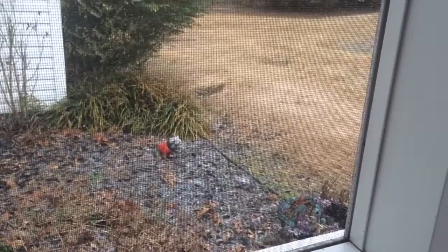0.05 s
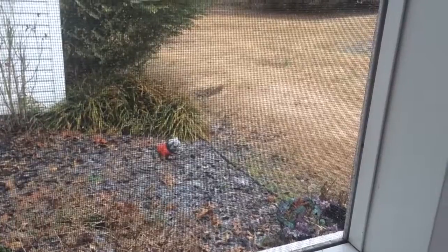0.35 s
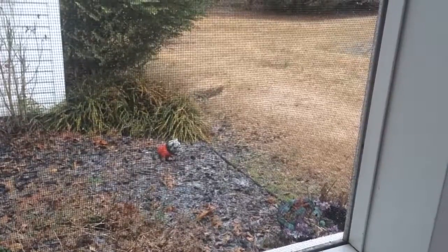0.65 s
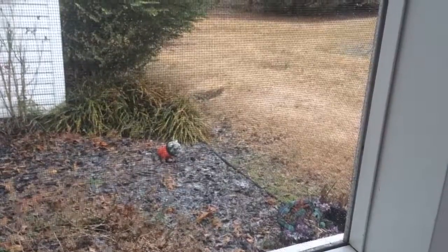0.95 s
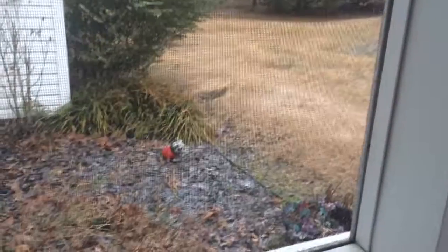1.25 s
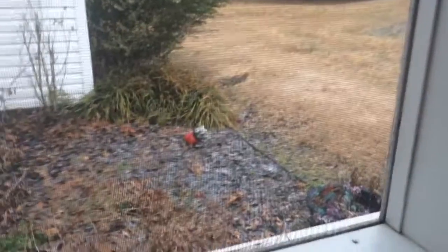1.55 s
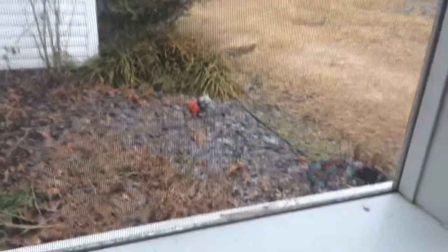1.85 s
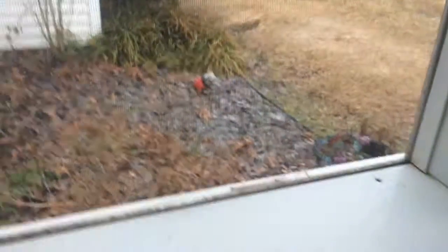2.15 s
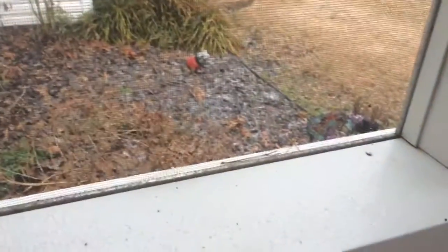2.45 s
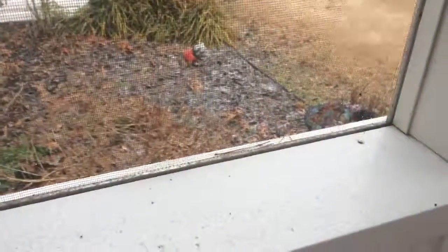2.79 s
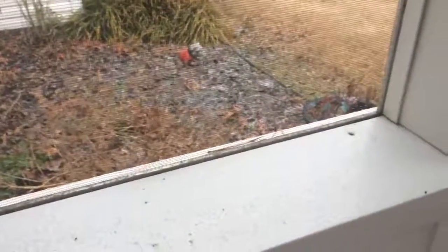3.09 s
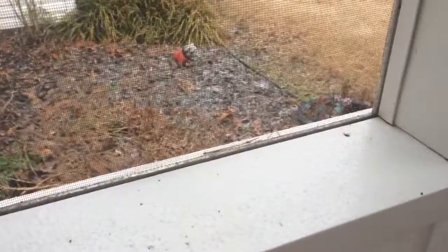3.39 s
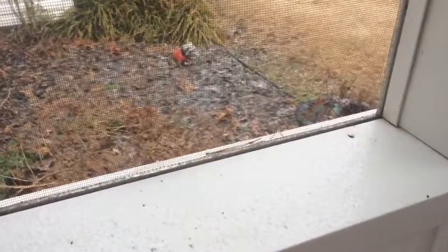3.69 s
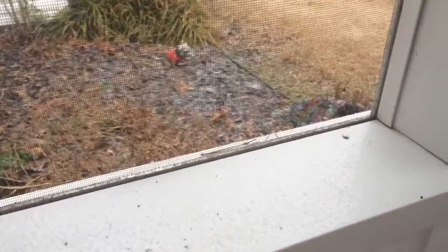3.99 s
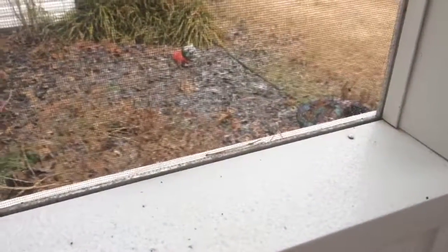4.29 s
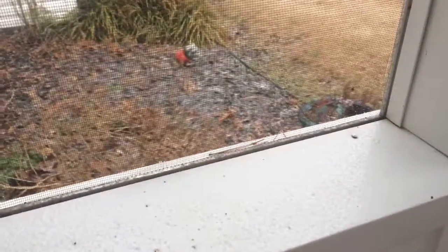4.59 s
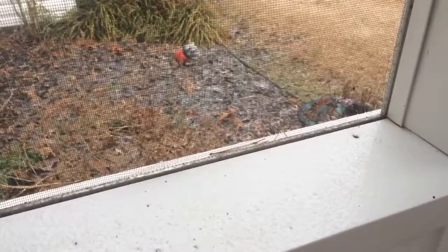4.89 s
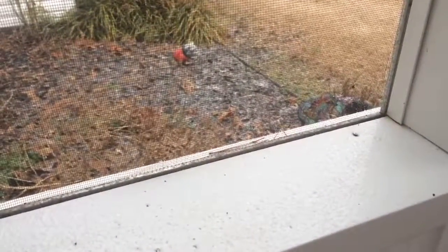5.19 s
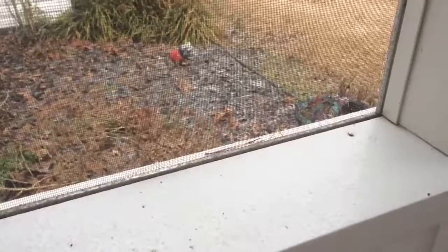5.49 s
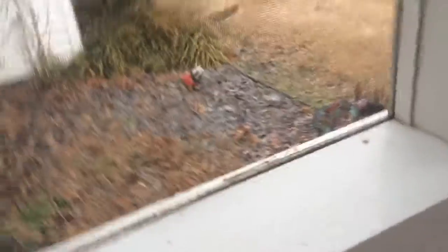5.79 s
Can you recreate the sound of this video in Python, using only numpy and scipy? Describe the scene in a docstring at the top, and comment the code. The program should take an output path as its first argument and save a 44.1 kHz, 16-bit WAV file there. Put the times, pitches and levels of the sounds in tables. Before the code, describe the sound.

Sharp little ticks of sleet hit close by an open window, with soft hiss from the garden and one distant bird whistle.

```python
"""Sleet at an open window.

Ice pellets tick on the sill and screen and skitter away; a few set a hard edge ringing or knock dully.
Smaller ones land on the garden bed and pat on leaves, and countless far ones on lawn and shrubs merge
into a grainy hiss. A low rumble lies underneath, and a distant bird gives one falling whistle. Mono."""
import sys
import numpy as np
from scipy import signal
from scipy.fft import rfft, irfft, next_fast_len
from scipy.io import wavfile

SR = 44100
rng = np.random.default_rng(int(sys.argv[2]) if len(sys.argv) > 2 else 0)


def unload_wav(signal):
    """Save mono or channel-first audio to the path in sys.argv[1] as 16-bit WAV at rate SR, clipped to [-1, 1]."""
    wavfile.write(
        sys.argv[1],
        SR,
        np.round(np.clip(np.atleast_2d(signal).T, -1, 1) * 32767).astype(np.int16),
    )


N = 257544

# Tone of the outdoor rumble: frequency_hz, gain_db
RUMBLE_EQ = [(20, -31), (30, -10), (40, -11), (50, 1), (62, -1), (80, -2), (100, -6.5), (118, -7),
             (140, -6), (180, -7), (220, -15.5), (300, -24), (500, -38.5)]
# Tone of far sleet on lawn and shrubs: frequency_hz, gain_db
FAR_SLEET_EQ = [(150, -47), (250, -6.5), (433, -9.5), (599, -7.5), (711, -5), (2160, -7.5), (3160, -2.5),
                (3810, -2), (7180, 2), (15000, -4)]
# How hard the sleet falls, as the level of its hiss: time_s, level_db
FALL_STRENGTH = [(0.0, -47.5), (0.6, -50), (1.27, -49.5), (1.6, -50), (2.1, -47.5), (2.62, -50.5),
                 (2.83, -48.5), (3.06, -51), (4.0, -50.5), (4.4, -51.5), (5.84, -50.5)]
# Soft, dull knocks: start_s, centre_hz, level_db
DULL_KNOCKS = [(.874, 484, -53.5), (1.457, 200, -52), (1.657, 920, -56.5), (2.72, 537, -55.5),
               (2.962, 520, -57), (4.716, 860, -53.5), (5.299, 900, -55.5)]
# Tone of a pellet's tick: frequency_hz, gain_db
TICK_EQ = [(200, -43), (500, -22.5), (1000, -14), (1800, -13.5), (3400, -1), (5000, -4), (7000, 1.5),
           (9000, -1), (11000, -1.5), (13300, -8), (15000, -5)]
# Tone of the skitter and reflections after a tick: frequency_hz, gain_db
SKITTER_EQ = [(200, -26), (500, -13), (1100, -4.5), (2000, -3), (3500, -2), (7000, 0.5), (10000, -1.5),
              (14000, -9.5)]
# Window frame resonances that every near tick excites: centre_hz, width_hz, gain_db
FRAME_RESONANCES = [(3530, 300, 0), (4840, 400, 2.5), (5990, 390, 3.5), (7240, 540, 1), (10780, 370, 3.5),
                    (12500, 600, 5)]
# Hard edges set ringing by a pellet: start_s, pitch_hz, peak_db
EDGE_PINGS = [(2.238, 2000, -40.5), (2.896, 2100, -43), (3.0042, 3600, -38), (3.2205, 3800, -42),
              (3.4993, 3590, -43), (4.636, 2500, -36), (4.635, 4560, -36), (5.679, 3440, -44)]
# Close pellets that stand out: start_s, tick_db, skitter_db (before its lift), body_db, top_db
# Body is an EQ shelf below about 4 kHz; top is an ice-bright shelf above about 8 kHz.
CLOSE_PELLETS = [(0.2043, -18.8, -39, -14.5, -2), (0.3383, -39, -53, 10, 7), (0.3861, -31.5, -40.5, -1, 9),
                 (0.4748, -36, -49.5, 3, 2), (0.5336, -36.5, -48.5, -15, 0),
                 (0.5624, -35.5, -42.5, -18, -1), (0.6136, -40, -47, -14, 3),
                 (0.7403, -32.5, -43.5, -11, 3), (1.0584, -41, -46, -5, -6), (1.0896, -45, -45.5, -9, -4),
                 (1.1064, -33.5, -47.5, 3, 3), (1.1633, -33, -43.5, -9, -5), (1.2065, -45, -47, 2, 1),
                 (1.2199, -32.5, -51, -2.5, -5), (1.289, -35.5, -46, 0, 16), (1.3105, -36.5, -48, 6, 10),
                 (1.4436, -41, -44, -4, 6), (1.4592, -35, -50, 4.5, -2), (1.5529, -38.5, -67, -4, -5),
                 (1.7845, -41, -49, -20, 5), (1.8654, -39, -44, 0, 5), (1.8941, -38.5, -45, 3, 1),
                 (1.9712, -42, -45.5, -1, -9), (2.0209, -41, -46, 8, -5), (2.0835, -35, -56, 6, 16),
                 (2.1676, -39, -65, 3, 1), (2.1819, -42, -48, -3, 7), (2.2375, -34.5, -51, -1, -6),
                 (2.3586, -34.5, -46, 9, 8), (2.4604, -38.5, -62, 9, 8), (2.64, -38.5, -49.5, 1.5, -5),
                 (2.896, -28.5, -47.5, 0.5, 8.5), (3.0038, -25, -43, -11, -15.5),
                 (3.401, -37.5, -42, -10, 2), (3.4527, -39, -48.5, 3, 5), (3.475, -38, -50, -18, -1),
                 (3.4992, -43, -60, 1, -12), (3.7024, -39, -52, 5, -3), (3.8225, -37.5, -46.5, -1, -4),
                 (3.8592, -37.5, -50.5, 15.5, 14), (3.9475, -40, -48, -2, 5), (4.0561, -34.5, -47.5, 4, -1),
                 (4.1626, -42, -50, 15, 1), (4.2275, -40, -52, -15, 11), (4.6147, -34.5, -47, -6, 5),
                 (4.6358, -32.5, -47.5, 12, 1), (4.7946, -47, -48, 15, 9), (4.8586, -37.5, -48, -17, -4),
                 (5.1187, -34.5, -48.5, -4, 2), (5.2682, -24, -52, -2, 17)]

HIT_SAMPLES = 4096


def amp(db):
    """Decibels to gain."""
    return 10 ** (np.asarray(db) / 20)


def unit(x):
    """Scales a sound to rms 1."""
    return x / np.sqrt(np.mean(x ** 2) + 1e-20)


def eq_db(curve, hz):
    """Reads an EQ curve on a log-frequency axis."""
    points_hz, db = np.transpose(curve)
    return np.interp(np.log(hz + 1), np.log(points_hz + 1), db)


def add(mix, start_s, sound):
    """Drops a sound into the mix."""
    part = mix[max(round(start_s * SR), 0):][:len(sound)]
    part += sound[:len(part)]


def colour(x, db_at):
    """Minimum-phase EQ with the gain db_at(hz): attacks stay sharp and the ringing follows them."""
    size = 2 * next_fast_len(len(x))
    cepstrum = irfft(np.log(amp(db_at(np.fft.rfftfreq(size, 1 / SR)))))
    cepstrum[1:size // 2] *= 2
    cepstrum[size // 2 + 1:] = 0
    return irfft(rfft(x, size) * np.exp(rfft(cepstrum)))[:len(x)]


def above(hz, edge_hz, octaves):
    """Soft crossover from 0 to 1 around edge_hz."""
    return .5 + .5 * np.tanh(np.log2((hz + 1) / edge_hz) / octaves)


def wander(rate_hz):
    """Smooth random drift of rms 1."""
    hz = np.fft.rfftfreq(N, 1 / SR)
    return unit(irfft(rfft(rng.standard_normal(N)) * (hz > 0) / (1 + (hz / rate_hz) ** 2), N))


def crackle(size, per_s, spread_db):
    """Random tiny impacts: many weak, a few strong."""
    strength = amp(spread_db * np.minimum(rng.exponential(1, size), 4))
    return strength * rng.choice([-1, 1], size) * (rng.random(size) < per_s / SR)


def fall_db(time_s):
    """How hard the sleet is falling at a given moment."""
    return np.interp(time_s, *np.transpose(FALL_STRENGTH))


def rumble(level_db=-58, swell_db=1.4):
    """Dull roar of the surroundings, swelling at random."""
    hz = np.fft.rfftfreq(N, 1 / SR)
    roar = irfft(rfft(rng.standard_normal(N)) * amp(eq_db(RUMBLE_EQ, hz)), N)
    return amp(level_db) * unit(roar * amp(swell_db * wander(rate_hz=5.4)))


def bird(start_s=4.03, length_s=.365, level_db=-52, top_hz=3650, echo_db=-7, echo_t60_s=.69):
    """A far, falling whistle: its fourth harmonic carries, the third is faint; the yard echoes it."""
    hold_s, sag_hz, sag_s, drop_hz, drop_s = .048, 850, .32, 130, .035
    attack_s, full_s, fade_db_per_s, release_s = .025, .17, 48, .015
    t = np.arange(N) / SR
    since, left = t - start_s, start_s + length_s - t
    # the pitch holds, sags, then drops as the call ends
    sag = sag_hz * (1 - np.exp(-np.maximum(since - hold_s, 0) / sag_s))
    drop = drop_hz * np.clip(1 - left / drop_s, 0, 1)
    pitch_hz = (top_hz - sag - drop) * (1 + .0015 * wander(rate_hz=60))
    phase = 2 * np.pi * np.cumsum(pitch_hz) / SR
    call = np.sin(phase) + amp(-16) * np.sin(phase * 3 / 4)
    call *= np.clip(since / attack_s, 0, 1) * np.clip(left / release_s, 0, 1)
    fade_db = fade_db_per_s * np.maximum(since - full_s, 0)
    flutter_db = 2.5 * wander(rate_hz=26)
    call *= np.sqrt(2) * amp(level_db - fade_db + flutter_db)
    yard = rng.standard_normal(SR) * amp(-60 * t[:SR] / echo_t60_s)
    echo = signal.fftconvolve(call, yard / np.linalg.norm(yard))[:N]
    return call + amp(echo_db) * echo


def far_sleet(grain=.73, patter_under_db=10, flutter_db=1):
    """Thousands of pellets a second merge into a hiss over a lower patter, both riding the fall."""
    hz = np.fft.rfftfreq(N, 1 / SR)
    impacts = grain * unit(crackle(N, per_s=3000, spread_db=2.6)) + rng.standard_normal(N)
    spectrum = rfft(impacts) * amp(eq_db(FAR_SLEET_EQ, hz))
    highs = above(hz, edge_hz=3900, octaves=.12)
    patter = unit(irfft(spectrum * (1 - highs), N)) * amp(-patter_under_db)
    hiss = unit(irfft(spectrum * highs, N))
    return (patter + hiss) * amp(fall_db(np.arange(N) / SR) + flutter_db * wander(rate_hz=24))


def soft_hit(centre_hz, level_db, octaves=.55, attack_s=.00095, t60_s=.11):
    """A soft blow on something heavily damped: a puff of noise about an octave wide."""
    t, hz = np.arange(HIT_SAMPLES) / SR, np.fft.rfftfreq(HIT_SAMPLES, 1 / SR)
    band = np.exp(-(np.log2((hz + 1) / centre_hz) / octaves) ** 2 / 2)
    puff = unit(irfft(rfft(rng.standard_normal(len(t))) * band))
    return puff * (1 - np.exp(-t / attack_s)) * amp(level_db - 60 * t / t60_s)


def leaf_pats(softest_db=-68, lowest_hz=280, octaves=2.78, count=220):
    """Pellets pat on soft leaves and soil; small stiff leaves sound higher and louder than soil."""
    out = np.zeros(N)
    for when, size, stiffness in rng.random((count, 3)):
        level_db = softest_db + 7 * size ** 2 + 4 * stiffness
        centre_hz = lowest_hz * 2 ** (octaves * stiffness)
        add(out, when * N / SR, soft_hit(centre_hz, level_db))
    return out


def knocks():
    """A few dull, damped knocks poke out of the patter."""
    out = np.zeros(N)
    for start_s, centre_hz, level_db in DULL_KNOCKS:
        add(out, start_s, soft_hit(centre_hz, level_db))
    return out


def pellet(tick_db, skitter_db, body_db, top_db, skitter_lift_db=3.5):
    """One ice pellet: a millisecond tick, then a skitter of rebounds and wall reflections."""
    def spot_db(hz):
        """The frame's resonances, plus the body and top of the spot that is hit."""
        frame = sum(db / (1 + (2 * (hz - centre) / width) ** 2) for centre, width, db in FRAME_RESONANCES)
        body = body_db * (1 - above(hz, edge_hz=4270, octaves=.059))
        top = top_db * above(hz, edge_hz=7800, octaves=.4)
        return frame + body + top

    t = np.arange(HIT_SAMPLES) / SR
    # a pellet that mostly skitters is farther off, which blunts its tick
    blunt_s = .0007 * np.clip(1 - (tick_db - skitter_db) / 13, 0, 1)
    attack_s, decay_s = .00006 + blunt_s, .0011 + blunt_s
    tick = rng.choice([-1, 1], len(t)) * (1 - np.exp(-t / attack_s)) * np.exp(-t / decay_s)
    tick = colour(tick, lambda hz: eq_db(TICK_EQ, hz) + spot_db(hz))
    skitter = unit(crackle(len(t), per_s=2500, spread_db=2.7)) + .65 * rng.standard_normal(len(t))
    skitter *= (1 - np.exp(-t / .0011)) * (np.exp(-t / .013) + .32 * np.exp(-t / .033))
    skitter = colour(skitter, lambda hz: eq_db(SKITTER_EQ, hz) + .24 * spot_db(hz))
    # each level is an rms, with the part's energy spread over its own short span
    tick_s, skitter_s = .0025, .0125
    tick *= amp(tick_db) * np.sqrt(tick_s * SR) / np.linalg.norm(tick)
    skitter *= amp(skitter_db + skitter_lift_db) * np.sqrt(skitter_s * SR) / np.linalg.norm(skitter)
    return tick + skitter


def garden_bed(spread_db=2.5, count=160):
    """Small pellets hit the mulch below the window, each with its own tone, as strong as the fall."""
    out = np.zeros(N)
    for when, smallness, body, top in rng.random((count, 4)):
        start_s = when * N / SR
        tick_db = fall_db(start_s) - .2 - spread_db * np.log(max(smallness, .07))
        add(out, start_s, pellet(tick_db, tick_db - 8.5, body_db=14 * body - 8, top_db=10 * top - 5))
    return out


def edge_pings(t60_s=.027):
    """A pellet catches a hard edge and rings one short mode of it."""
    out, t = np.zeros(N), np.arange(HIT_SAMPLES) / SR
    for start_s, pitch_hz, peak_db in EDGE_PINGS:
        add(out, start_s, amp(peak_db - 60 * t / t60_s) * np.sin(2 * np.pi * pitch_hz * t))
    return out


def sill_pellets(hop_share=.3, mean_hop_s=.013, hop_loss_db=10.5, hop_max_db=-44):
    """Large pellets strike the sill and screen up close; some hop and land once more, weaker."""
    out = np.zeros(N)
    hops = rng.random((len(CLOSE_PELLETS), 2))
    for (start_s, tick_db, skitter_db, *tone), (chance, height) in zip(CLOSE_PELLETS, hops):
        add(out, start_s, pellet(tick_db, skitter_db, *tone))
        hop_db = min(tick_db - hop_loss_db, hop_max_db)
        landing = pellet(hop_db, hop_db - 15, *tone)
        if chance < hop_share:
            add(out, start_s + mean_hop_s * (.5 + height), landing)
    return out


def scene():
    """Close hits over the garden backdrop, the same in both channels."""
    hits = sill_pellets() + edge_pings() + knocks() + leaf_pats() + garden_bed()
    mono = hits + far_sleet() + rumble() + bird()
    return np.array([mono, mono])


def record(dry):
    """A steep low-pass trims the very top of the mix."""
    cutoff_hz = 15350
    taps = signal.firwin(511, cutoff_hz, window=("kaiser", 9), fs=SR)
    return signal.oaconvolve(dry, taps[None], "same", axes=1)


dry = scene()
out = record(dry)
unload_wav(out)
```